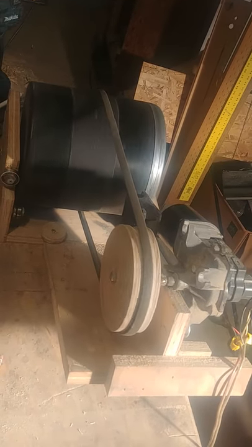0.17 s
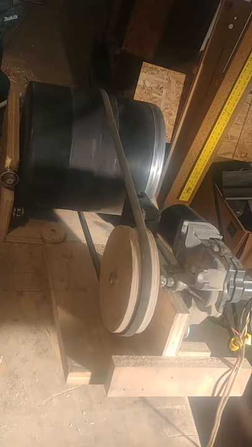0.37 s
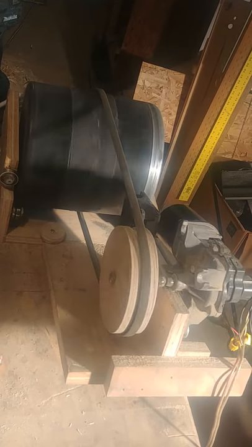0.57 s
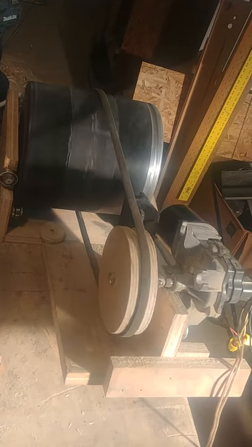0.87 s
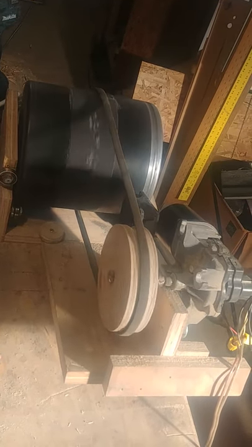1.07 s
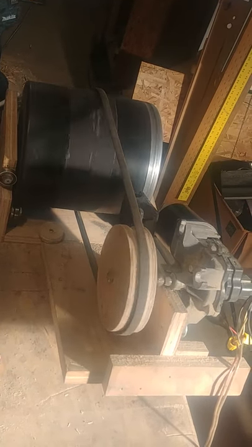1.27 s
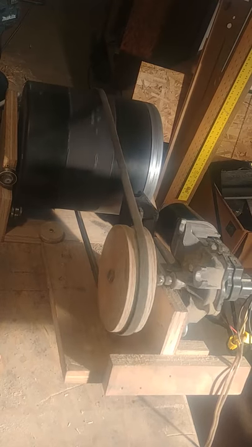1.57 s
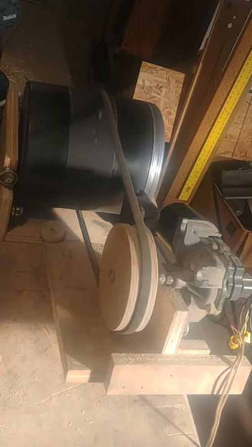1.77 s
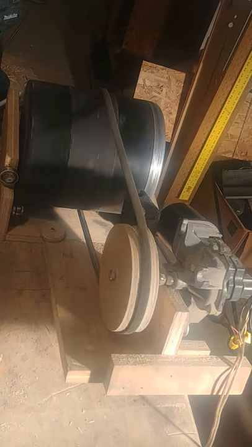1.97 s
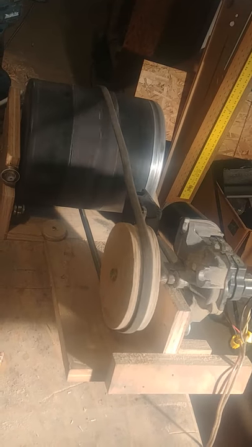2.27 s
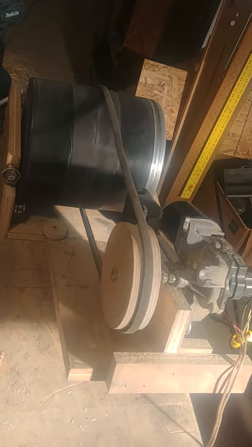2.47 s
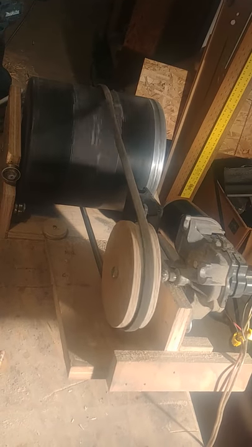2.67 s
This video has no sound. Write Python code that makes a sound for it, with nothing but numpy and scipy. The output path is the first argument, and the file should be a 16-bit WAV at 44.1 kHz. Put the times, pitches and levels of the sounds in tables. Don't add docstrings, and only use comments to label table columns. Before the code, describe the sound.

A drum of stones tumbles continuously on motor-driven rollers, close up in a small workshop. Hard knocks open the sound within 0.25 s, then irregular clacks, gritty slides and hollow low booms follow throughout, over a steady rumbling hum and rush. Metallic pings come near 0.95 and 1.08 s, a short lid scrape with low knocks around 1.8 s, brighter pings at 2.2-2.3 s, and the rumble swells at the end.

```python
import sys
import numpy as np
from scipy import signal
from scipy.fft import rfft, irfft, next_fast_len
from scipy.io import wavfile
from scipy.ndimage import uniform_filter1d, map_coordinates

SR = 44100
rng = np.random.default_rng(int(sys.argv[2]) if len(sys.argv) > 2 else 0)


def convert_level_to_amplitude(level_db):
    exponent = np.asarray(level_db, float) / 20
    return 10 ** exponent


def dump(signal):
    limited = np.clip(np.atleast_2d(signal).T, -1, 1)
    pcm = np.round(limited * 32767).astype(np.int16)
    wavfile.write(sys.argv[1], SR, pcm)


N = 124803

# (frequency [Hz], density [dB per Hz])
STONE_SPECTRUM = [(500, -21.5), (950, -2), (1250, -8.5), (2720, -8.5), (5310, -12.5), (6570, -20.5),
                  (7600, -18.5), (9000, -18.5)]


def unit(x):
    return x / np.sqrt(np.mean(x ** 2) + 1e-20)


def along(points, hz):
    f, v = np.transpose(points)
    return np.interp(np.log(hz + 1), np.log(f + 1), v)


def curve(rows):
    s, v = np.transpose(rows)
    return np.interp(np.arange(N) / SR, s, v)


def wobble(rate):
    return map_coordinates(rng.standard_normal(2000), [np.arange(N) * rate / SR])


def filtered(x, response):
    m = next_fast_len(N + SR // 2)
    return irfft(rfft(x, m) * response(np.fft.rfftfreq(m, 1 / SR)), m)[..., :N]


def resonant(peaks):
    def response(f):
        total = 0
        for k, (centre, width, db) in enumerate(peaks):
            damping = 1j * f * abs(width)
            total = total + (-1) ** k * convert_level_to_amplitude(db) * damping / (centre * centre - f * f + damping)
        return total
    return response


def grit(spread_db, patchy_db):
    # (frequency [Hz], likeness [0 to 1])
    coherence = [(60, 0.91), (180, 1), (350, 0.87), (700, 0.52), (1400, 0.088), (8000, 0.033)]
    sizes = np.minimum(rng.exponential(size=N), 4)
    raw = rng.standard_normal((2, N)) * convert_level_to_amplitude(spread_db * sizes)
    z = signal.stft(raw, nperseg=256)[2]
    field = uniform_filter1d(rng.standard_normal(z.shape[1:]), size=5, axis=0)
    field = uniform_filter1d(field, size=9, axis=1)
    pair = signal.istft(z * convert_level_to_amplitude(patchy_db * unit(field)), nperseg=256)[1][:, :N]

    def mid_side_gain(hz):
        angle = np.arccos(np.clip(along(coherence, hz), -1, 1)) / 2
        return np.array([np.cos(angle), np.sin(angle)])

    mid, side = filtered(pair, mid_side_gain)
    return np.array([mid + side, mid - side])


def add(track, s, sound):
    part = track[round(s * SR):][:len(sound)]
    part += sound[:len(part)]


def rings(events, ratios, t60, attack_s, lift_db):
    out, t = np.zeros(N), np.arange(SR // 4) / SR
    luck = rng.standard_normal((len(events), len(ratios)))
    for (s, db, hz), chances in zip(events, luck):
        tone = 0
        for (ratio, mode_db), chance in zip(ratios, chances):
            tone = tone + convert_level_to_amplitude(mode_db + 2.6 * chance) * np.sin(2 * np.pi * hz * ratio * t)
        decay = convert_level_to_amplitude(db + lift_db - 60 * t / t60)
        add(out, s, decay * (1 - np.exp(-t / attack_s)) * tone)
    return out


def cracks(events, t60, tone):
    shape, t = np.zeros(N), np.arange(SR // 10) / SR
    for s, db in events:
        add(shape, s + .001, convert_level_to_amplitude(db - 60 * t / t60))
    noise = np.sign(rng.standard_normal((3, N)))
    return filtered(shape * (noise[:2] + .7 * noise[2]), resonant(tone))


def sliding_bed():
    # (time [s], level [dB])
    tumble = [(0, -31), (.15, -35), (.22, -30), (.34, -40.5), (.43, -31.5), (.55, -36.5), (.75, -34),
              (.91, -34), (.98, -35), (1.06, -32.5), (1.18, -39), (1.4, -36.5), (1.6, -34.5), (1.9, -32.5),
              (2.23, -37), (2.45, -37), (2.6, -44), (2.83, -33)]
    bed = filtered(grit(4.8, patchy_db=2.5), lambda hz: convert_level_to_amplitude(along(STONE_SPECTRUM, hz)))
    return convert_level_to_amplitude(curve(tumble) + 1.26 * wobble(110)) * unit(bed)


def roller_rush():
    # (frequency [Hz], density [dB per Hz])
    rolling = [(40, -59.5), (65, -22), (178, -5.5), (400, -13), (1000, -16.5), (1600, -20.5), (3500, -32)]
    return unit(filtered(grit(1.6, patchy_db=1.63), lambda hz: convert_level_to_amplitude(along(rolling, hz))))


def frame_hum():
    # (frequency [Hz], width [Hz], level [dB])
    frame_modes = [(294.4, 15, -18), (393, 10.4, 1), (493.4, 11, 4), (628.4, 47, -2), (662.8, 12.7, 3.5),
                   (738.5, 39, -1.5), (841, 22.5, -2), (960.5, 39, -3), (1155, 6.7, 0.5)]
    return unit(filtered(grit(1.23, patchy_db=1.6), resonant(frame_modes)))


def barrel_hum():
    # (frequency [Hz], width [Hz], level [dB])
    barrel_modes = [(182.7, 12.2, -5), (238.7, 48, -7.5), (258.3, 61, -9), (94.3, 4, -19), (70.5, 41, -25)]
    modes = resonant(barrel_modes)
    return unit(filtered(grit(0.47, patchy_db=2.55), lambda hz: modes(hz) / (1 + (55 / (hz + 1)) ** 6)))


def machine():
    # (time [s], level [dB])
    weight = [(0, -30.5), (.5, -31), (.65, -29.5), (1.3, -28.5), (1.7, -30.5), (2.3, -29.5), (2.57, -30),
              (2.7, -28), (2.83, -24.5)]
    barrel = convert_level_to_amplitude(-1.0 + 1.5 * wobble(23)) * barrel_hum()
    return convert_level_to_amplitude(curve(weight)) * (convert_level_to_amplitude(-2.0) * roller_rush() + convert_level_to_amplitude(-4.5) * frame_hum() + barrel)


def top_hiss():
    # (frequency [Hz], density [dB per Hz])
    hiss_spectrum = [(10800, -63), (11700, 0), (15400, 4), (15800, -63)]
    # (time [s], rise [dB])
    flares = [
        (.95, 9),
        (1.088, 11),
        (1.81, 7),
    ]
    hiss = unit(filtered(grit(0.3, patchy_db=2.5), lambda hz: convert_level_to_amplitude(along(hiss_spectrum, hz))))
    t = np.arange(N) / SR
    flare_db = sum(db * np.exp(-((t - s) / 0.019) ** 2) for s, db in flares)
    return convert_level_to_amplitude(-71.5 + flare_db + 1.3 * wobble(25)) * hiss


def knocks():
    # (time [s], peak level [dB], pitch [Hz])
    stone_knocks = [
        (0.0141, -16.5, 1790),
        (0.1828, -14.5, 1482),
        (0.2455, -14, 1435),
        (0.7534, -19.5, 3210),
        (1.445, -32, 1920),
        (1.6314, -30, 1890),
        (1.8456, -15.5, 1160),
        (1.8926, -16.5, 1360),
        (2.7932, -25.5, 1670),
    ]
    ratios = [(.67, -5), (1, 4.5), (1.42, 0), (1.7, -9.5), (2.2, -14)]
    ringing = rings(stone_knocks, ratios, 0.038, 0.00051, lift_db=-12.0)
    return ringing * (.85 + .35 * wobble(300))


def first_contacts():
    # (time [s], peak level [dB], brightness [dB])
    snaps = [(0.0178, -26, -4), (0.168, -22, -3), (0.1807, -16, -9), (0.2437, -19.5, -13),
             (0.2818, -21, -2), (0.3665, -23.5, -4), (0.4597, -26, -6), (0.5196, -22.5, -13),
             (0.5793, -25, -6), (0.6062, -25, -8), (0.7058, -23, -7), (0.7535, -24.5, -9),
             (0.8572, -12, -6), (0.933, -23, -7), (0.9477, -15, -5), (1.0154, -18.5, -3), (1.077, -30, -10),
             (1.1549, -17, -7), (1.3514, -15, -7), (1.41, -14.5, -7), (1.4452, -17, -4.5),
             (1.4855, -21, -5), (1.587, -21, -6), (1.6312, -13, -5.5), (1.681, -25, -7), (1.7567, -18, -4),
             (1.831, -13, -6.5), (1.8452, -12, -9), (1.891, -14.5, -2), (2.139, -20, -3), (2.2458, -20, -6),
             (2.3456, -15.5, -6.5), (2.393, -18, -9), (2.5007, -19, -4), (2.616, -12.5, 1),
             (2.6386, -27, -6), (2.7622, -16.5, -6), (2.7921, -14, -6)]
    # (frequency [Hz], width [Hz], level [dB])
    dull_tone = [(2700, 3200, 2.5)]
    bright_tone = [(6500, 3900, 0.0019)]
    dull = cracks([(s, db - 4.5) for s, db, _ in snaps], 0.011, dull_tone)
    bright = cracks([(s, db + up - 9.5) for s, db, up in snaps], 0.011, bright_tone)
    return dull + bright


def clumps():
    # (time [s], peak level [dB], brightness [dB], decay t60 [s])
    clacks = [(0.018, -18, -22, 0.15), (0.17, -24, -14, 0.23), (0.1832, -15, -14.5, 0.12),
              (0.2438, -12.5, -24, 0.14), (0.2813, -17, -19, 0.15), (0.364, -18.5, -18, 0.12),
              (0.578, -22.5, -20, 0.16), (0.6066, -26, -7, 0.13), (0.9346, -24.5, -3, 0.14),
              (1.0777, -20.5, -20, 0.15), (1.3533, -26.5, -10.5, 0.18), (1.446, -12.5, -14, 0.19),
              (1.587, -17, -8, 0.23), (1.635, -19.5, -9, 0.045), (1.847, -18.5, -12, 0.44),
              (1.985, -39, -32, 0.073), (2.027, -22, -13, 0.54), (2.138, -23, -6.5, 0.12),
              (2.167, -33, -14, 0.068), (2.2455, -22.5, -3, 0.09), (2.39, -18.5, -10.5, 0.5),
              (2.614, -17, -11, 0.21), (2.64, -16, -10, 0.28)]
    # (time [s], peak level [dB], brightness [dB], decay t60 [s])
    slides = [(0.1044, -29.5, -16, 0.12), (0.453, -16, -9.5, 0.11), (0.6594, -27, -12, 0.15),
              (0.705, -20, -11, 0.29), (0.748, -20.5, -8.5, 0.12), (0.7944, -23, -8, 0.29),
              (0.8555, -22, -12, 0.13), (0.9477, -18.5, -2.5, 0.22), (1.012, -19, -6.5, 0.068),
              (1.124, -24.5, -3.5, 0.29), (1.156, -14, -15, 0.38), (1.238, -25, 1, 0.13),
              (1.488, -15.5, -9.5, 0.26), (1.6835, -17, -17, 0.34), (1.754, -18, -21, 0.18),
              (1.81, -28, -11, 0.18), (1.893, -12, -17, 0.26), (2.2912, -29, -15, 0.11),
              (2.347, -16.5, -8.5, 0.28), (2.4996, -13.5, -14, 0.28), (2.7456, -21, -11.5, 0.53),
              (2.789, -12, -11.5, 0.16)]
    dull, bright, t = np.zeros(N), np.zeros(N), np.arange(SR // 2) / SR
    for events, rise_s in [(clacks, 0.00087), (slides, 0.0067)]:
        for s, db, bright_db, t60 in events:
            shape = convert_level_to_amplitude(db - 60 * t / max(t60, .01)) * (1 - np.exp(-t / rise_s))
            add(dull, s, shape ** 2)
            add(bright, s, (shape * convert_level_to_amplitude(bright_db)) ** 2)
    colour = lambda hz: convert_level_to_amplitude(along(STONE_SPECTRUM, hz))
    high = lambda hz: 1 / (1 + (4100 / (hz + 1)) ** 4)
    low_part = unit(filtered(grit(4.5, patchy_db=1.6), lambda hz: colour(hz) * (1 - high(hz))))
    high_part = unit(filtered(grit(4.5, patchy_db=1.8), lambda hz: colour(hz) * high(hz)))
    uneven = convert_level_to_amplitude(1.9 * wobble(330))
    return uneven * (convert_level_to_amplitude(-12.0) * np.sqrt(dull) * low_part + convert_level_to_amplitude(0.5) * np.sqrt(bright) * high_part)


def booms():
    # (time [s], peak level [dB], pitch [Hz])
    thuds = [(0.093, -18.5, 183.5), (0.127, -18.5, 188), (0.178, -19.5, 167.4), (0.245, -17, 187),
             (0.31, -14, 179), (0.333, -16.5, 201), (0.367, -21.5, 176), (0.459, -24.5, 171),
             (0.503, -25, 207), (0.542, -26, 195.6), (0.566, -12, 197.3), (0.612, -17, 203),
             (0.631, -12.5, 189.4), (0.655, -24, 213), (0.701, -16, 188), (0.746, -17, 234),
             (0.786, -21, 169.6), (0.815, -18.5, 184), (0.854, -17.5, 177), (0.91, -16, 190),
             (0.969, -25.5, 191), (1.046, -11, 176.7), (1.127, -32, 175), (1.177, -12.5, 184),
             (1.239, -17.5, 193.4), (1.277, -18, 194), (1.332, -19.5, 180), (1.382, -22, 217),
             (1.421, -25.5, 245), (1.496, -14.5, 180.6), (1.528, -17, 172), (1.565, -14.5, 170),
             (1.588, -15, 203), (1.635, -23, 174), (1.721, -17, 180.6), (1.768, -15, 182),
             (1.796, -22.5, 175.6), (1.858, -19, 186), (1.92, -19, 173), (1.984, -24, 184),
             (2.076, -19, 180), (2.129, -22, 184.4), (2.224, -19.5, 172), (2.31, -19, 172),
             (2.364, -21.5, 168), (2.461, -21.5, 182.5), (2.588, -13.5, 194), (2.719, -19, 183),
             (2.761, -22, 216), (2.804, -12.5, 169)]
    return rings(thuds, [(.92, -4.5), (1.03, -1.5), (1.27, -14.5)], 0.11, 0.0088, lift_db=3.5)


def pings():
    # (time [s], peak level [dB], pitch [Hz])
    lid_strikes = [
        (0.1695, -27, 6180),
        (0.9465, -17.5, 7070),
        (1.0786, -18, 7670),
        (1.8062, -29.5, 7020),
        (2.167, -14.5, 7620),
        (2.2452, -17, 7580),
        (2.2909, -14, 8100),
        (2.615, -33, 5900),
        (2.6384, -23, 7920),
    ]
    ratios = [(.93, -8), (.97, -5), (1, -10.5), (1.025, -9.5), (1.06, -7)]
    ringing = rings(lid_strikes, ratios, 0.099, .0004, lift_db=-11.5)
    return ringing * (.4 + .8 * wobble(400))


def lid_scrapes():
    # (time [s], peak level [dB])
    strokes = [
        (1.793, -30),
        (1.807, -22),
        (1.824, -28),
        (1.837, -32),
        (1.852, -29),
        (.95, -26),
        (1.08, -25.5),
    ]
    # (frequency [Hz], width [Hz], level [dB])
    lid_tone = [(10600, 1760, 9)]
    return cracks(strokes, .07, lid_tone)


def walls(x):
    # (frequency [Hz], t60 [s])
    room_decay = [(1000, 0.29), (8000, 0.1)]
    hz, t, z = signal.stft(rng.standard_normal((2, SR // 2)), SR, nperseg=256)
    decay = convert_level_to_amplitude(-60 * t / along(room_decay, hz)[:, None])
    tail = signal.istft(z * decay, SR, nperseg=256)[1]
    delayed = np.pad(x, (200, 0))[None]
    return signal.fftconvolve(delayed, tail / np.linalg.norm(tail[0]), axes=1)[:, :N]


def scene():
    # (frequency [Hz], left over right [dB])
    lean = [(60, 6), (180, 2), (350, 7), (800, 3), (5000, 4.5), (9000, 3)]
    sharp = knocks() + pings()
    crisp = first_contacts() + lid_scrapes()
    mix = sliding_bed() + clumps() + machine() + sharp + booms() + crisp
    mix = mix + convert_level_to_amplitude(0.5) * walls(sharp + 1.2 * crisp[0])
    return filtered(mix, lambda hz: convert_level_to_amplitude(along(lean, hz) / 2 * np.array([[1], [-1]])))


def band_limit(x):
    return signal.sosfilt(signal.butter(12, 15750, fs=SR, output="sos"), x)


def record(dry):
    # (frequency [Hz], gain [dB])
    mic_response = [(30, -11), (60, 0.5), (7700, 0), (9000, -18), (9800, -37.5), (11000, -43), (12400, -62)]
    heard = filtered(dry, lambda hz: convert_level_to_amplitude(along(mic_response, hz))) + top_hiss()
    return band_limit(heard)


dry = scene()
out = record(dry)
dump(out)
```